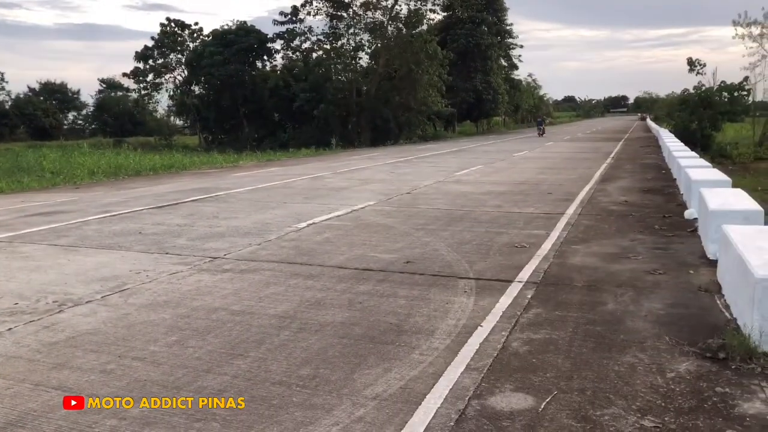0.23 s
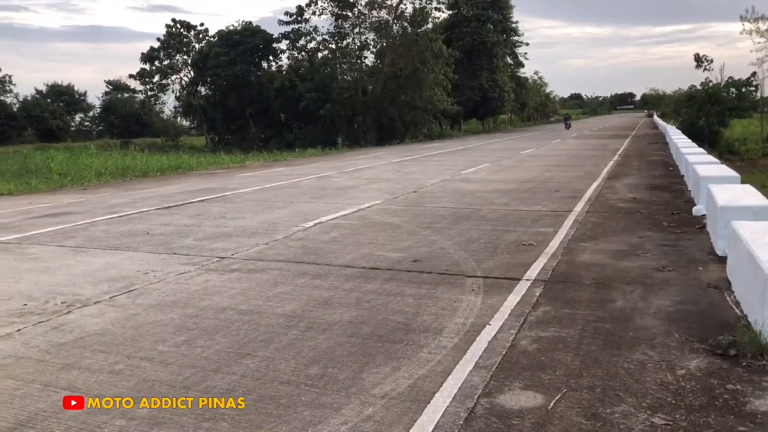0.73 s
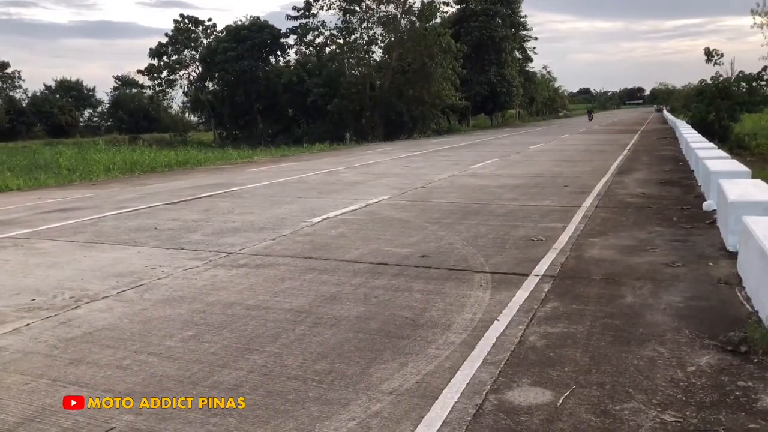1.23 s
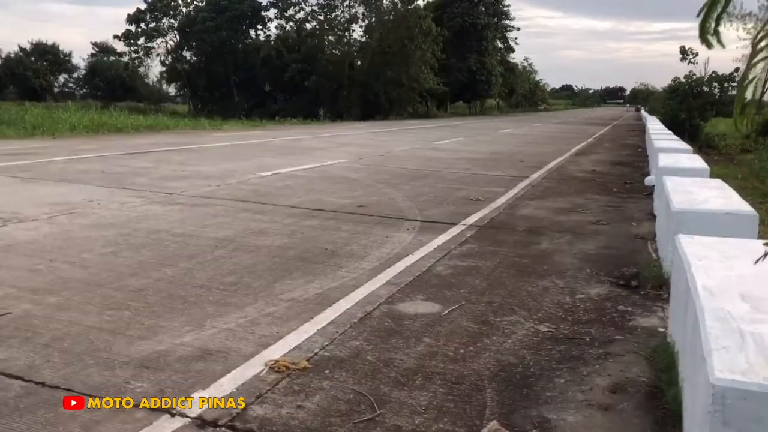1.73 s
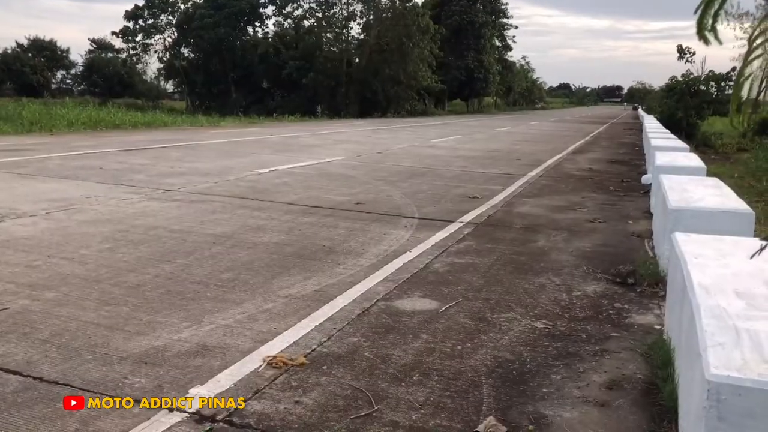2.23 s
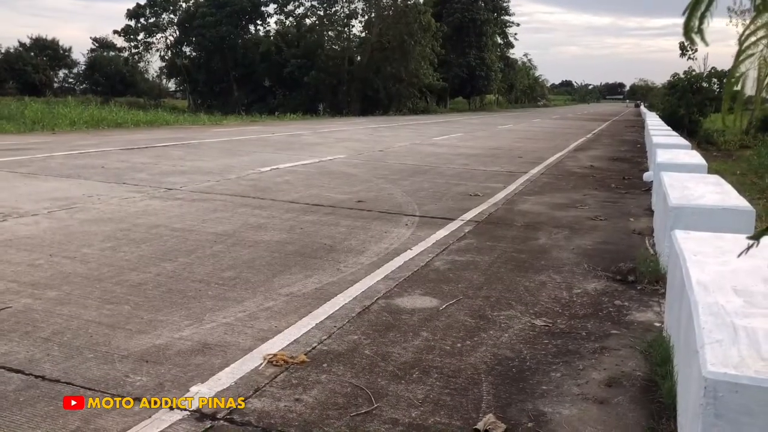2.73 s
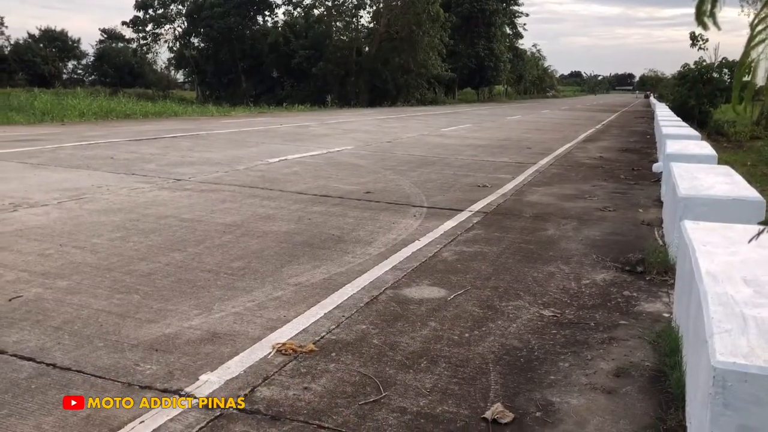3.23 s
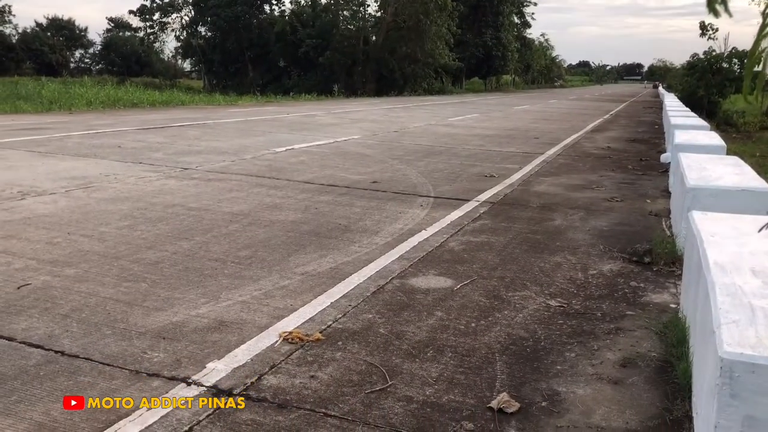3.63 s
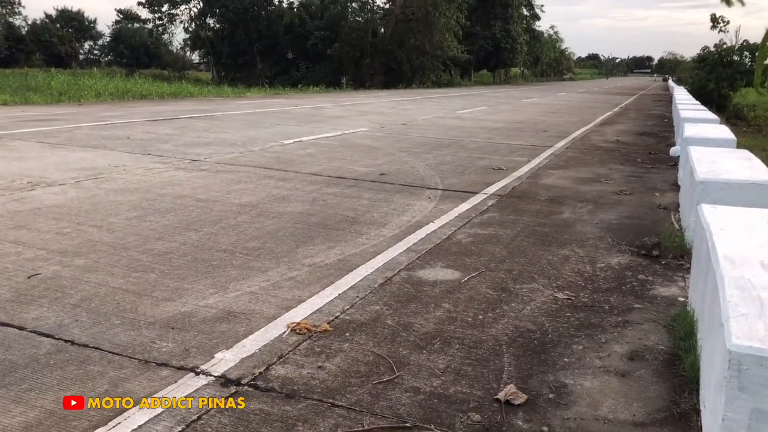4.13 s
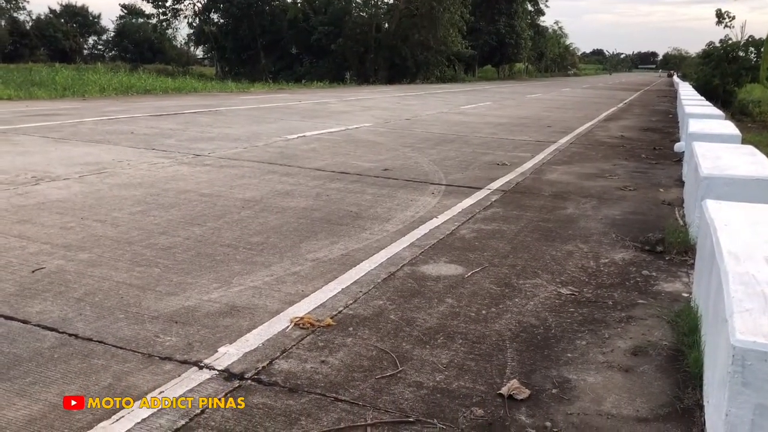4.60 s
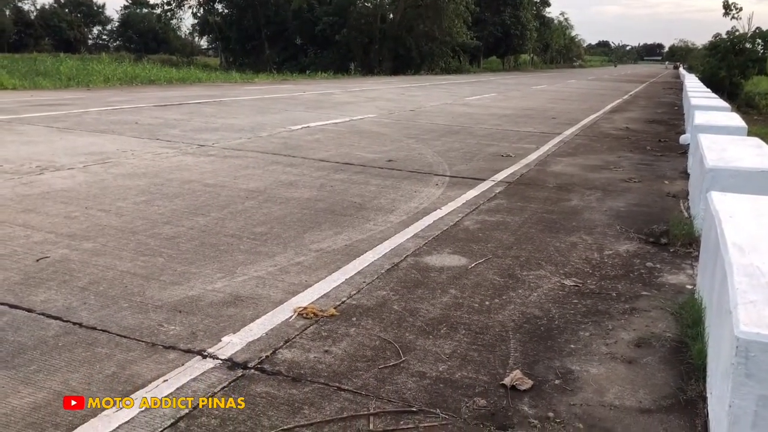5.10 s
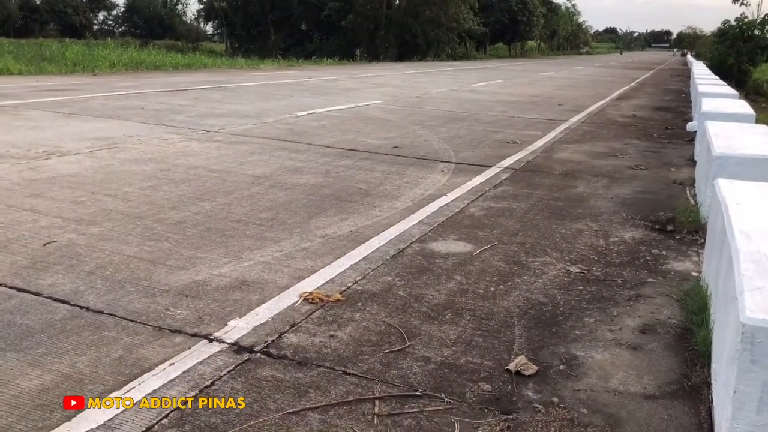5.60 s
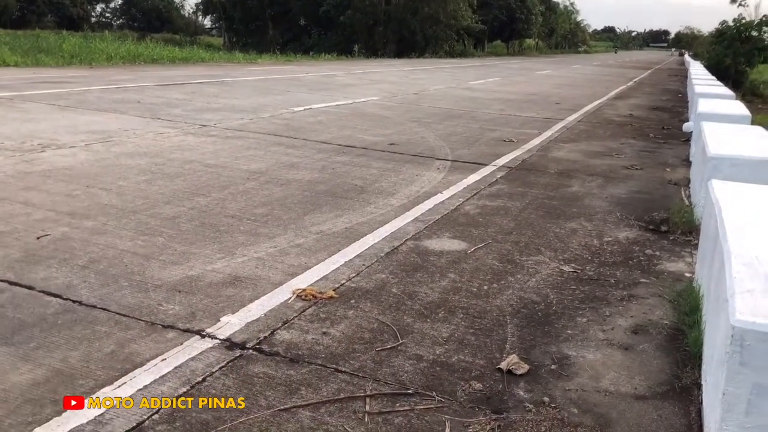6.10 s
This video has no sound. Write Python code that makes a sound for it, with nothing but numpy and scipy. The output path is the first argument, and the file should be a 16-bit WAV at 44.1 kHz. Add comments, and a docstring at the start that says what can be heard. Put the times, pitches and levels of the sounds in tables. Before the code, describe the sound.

On an open country road, a two-stroke motorcycle rasps close by, sharp and crackling, holding a steady buzz before revving up. It fades to silence at about 1.7 seconds. A quieter, more distant engine fades in, climbs in pitch, flutters through a gear change near 4 seconds, drops and pulls steadily again. Low wind rumbles on the microphone, with faint hiss and thin cricket chirps.

```python
"""A two-stroke motorcycle on an open country road, in two passages joined by a fade through silence.
Sines locked to the crank make the engine tone; each firing adds a sharp crack and a puff of gas noise,
and the rear wheel tugs at the engine speed once a turn. The first passage is close and bright. The second
is further off, with a gear change. The rhythm jumps now and then, as in slowed-down playback.
Filtered noise makes wind and faint hiss; short sine chirps, a cricket."""
import sys
import numpy as np
from scipy import signal
from scipy.fft import rfft, irfft, next_fast_len
from scipy.io import wavfile
from scipy.ndimage import uniform_filter1d

SR = 44100
rng = np.random.default_rng(int(sys.argv[2]) if len(sys.argv) > 2 else 0)


def pcm_store(signal):
    """Save signal as 16-bit PCM."""
    levels = np.round(np.clip(np.atleast_2d(signal), -1, 1) * 32767)
    wavfile.write(sys.argv[1], SR, levels.astype(np.int16).T)


N = 280035
T = np.arange(N) / SR  # time in seconds
CUT_S = 1.67  # the close passage gives way to the distant one

# Low engine orders for each way of riding. Each row: multiple of the firing rate, relative level in dB.
CRUISING = [(1, 3.5), (2, -0.5), (3, 0.5), (4, -6), (5, -10.5), (6, -7), (7, -15), (8, -11), (9, -33),
            (10, -2), (11, -18), (12, -3.5), (13, -9), (14, -0.5), (15, -6), (16, -2.5), (17, -7.5),
            (18, -1), (19, -21), (20, -2.5), (21, -10), (22, -7.5)]
OPENING_UP = [(1, -1), (2, -6), (3, -0.5), (4, 0), (5, -3.5), (6, -12), (7, -31), (8, -2.5), (9, -11),
              (10, -6.5), (11, -10), (12, 1.5), (13, -15), (14, -1), (15, -10), (16, -2.5), (17, 4),
              (18, -7), (19, -5.5), (20, -2), (21, -13), (22, -16)]
REVVING = [(1, 2), (2, -6), (3, -12), (4, -11), (5, -1), (6, -22), (7, -7.5), (8, -10), (9, -12), (10, -17),
           (11, -5.5), (12, -12), (13, -0.5), (14, -8), (15, 0), (16, -6), (17, -17), (18, 2.5), (19, -18),
           (20, -8), (21, -20.5), (22, -16)]
PULLING_AWAY = [(1, -9), (2, -10), (3, -9), (4, -12), (5, -3), (6, -11.5), (7, -13), (8, -7.5), (9, -14.5),
                (10, -9), (11, -9), (12, -17), (13, -18.5), (14, -15), (15, -14), (16, -10.5), (17, -14.5),
                (18, -12), (19, -13), (20, -16), (21, -12), (22, -19)]
FULL_REVS = [(1, -11.5), (2, -8), (3, -8.5), (4, -1), (5, -10), (6, -22), (7, -7), (8, -11), (9, -8.5),
             (10, -12), (11, -21), (12, -15.5), (13, -12), (14, -19.5), (15, -10.5), (16, -26), (17, -13.5),
             (18, -25), (19, -12), (20, -23), (21, -16.5), (22, -22)]
CLUTCH_SLIPPING = [(1, -11.5), (2, -12), (3, -13), (4, -8), (5, -4.5), (6, -4), (7, -11), (8, -10),
                   (9, -11.5), (10, -9), (11, -10.5), (12, -14), (13, -15.5), (14, -12), (15, -10),
                   (16, -15), (17, -12), (18, -20), (19, -11), (20, -20), (21, -7.5), (22, -17)]
HIGH_GEAR = [(1, -7.5), (2, -10), (3, -15.5), (4, -10), (5, -1.5), (6, -5.5), (7, -15), (8, -4), (9, -11),
             (10, -7), (11, -13), (12, -7), (13, -11.5), (14, -13.5), (15, -17), (16, -12), (17, -12),
             (18, -13.5), (19, -12), (20, -13), (21, -6.5), (22, -16)]


def crank():
    """Firing rate, turns run up with the wheel's tug in them, and the summed jumps of the heard rhythm."""
    # Engine speed. Each row: time in seconds, firings per second (before the tug).
    speed = [(0, 105.5), (.3, 107.6), (1.05, 108), (1.27, 108.5), (1.36, 114.5), (1.465, 123), (1.65, 123),
             (1.7, 98), (2.05, 106), (2.35, 111), (2.65, 120), (3.25, 131), (3.7, 138), (3.77, 142),
             (3.84, 139), (3.89, 130), (4.0, 146.5), (4.045, 151.3), (4.114, 156.4), (4.15, 152.3),
             (4.25, 135.5), (4.4, 124.2), (4.6, 116.3), (4.97, 109), (5.09, 101), (5.33, 103.5), (5.6, 106),
             (5.9, 108), (6.35, 112)]
    # Clutch engaged under load. Each row: start in seconds, end in seconds,
    # engine turns per wheel turn, tug on the speed in Hz.
    gears = [(0.05, 1.3, 7.24, 1.09), (1.862, 3.716, 13.1, 1.19), (5.143, 6.346, 8.27, 1.39)]
    # Sudden jumps in the rhythm, as in slowed-down playback. Each row: time in seconds,
    # delay of all later firings in engine turns.
    jumps = [(.22, 0.41), (.48, -0.41), (0.709, 0.47), (0.761, 0.36), (.785, 0.16), (0.985, 0.46),
             (1.14, 0.24), (1.204, 0.29), (1.352, 0.28), (1.435, 0.36), (1.815, 0.17), (2.198, 0.17),
             (2.369, -0.23), (2.657, 0.48), (2.786, 0.5), (3.394, -0.47), (3.506, 0.24), (3.724, .43),
             (3.87, 0.42), (3.975, 0.26), (4.428, .25), (4.67, 0.5), (4.998, -.21), (5.205, 0.41),
             (5.382, 0.14), (5.478, -0.14), (5.678, 0.14), (5.775, 0.24), (5.95, -0.21), (6.254, -.2)]
    hz = follow(speed)
    smooth_turns = np.cumsum(hz) / SR
    for start, end, ratio, tug_hz in gears:
        wheel_turns = (smooth_turns - np.interp(start, T, smooth_turns)) / ratio
        engaged = np.clip(np.minimum(T - start + .1, end - T) / .06, 0, 1)
        hz = hz + tug_hz * engaged * np.cos(2 * np.pi * wheel_turns)
    turns = np.cumsum(hz) / SR
    delayed = sum(delay * (T > s) for s, delay in jumps)
    return np.array([T, hz, turns, delayed])


def orders(motion, ride, upper, pipe, wander_db, scatter, waver, lean, lead_s, count):
    """Sines locked to the crank; at a jump the old rhythm melts into the new within a few ms."""
    t, hz, turns, delayed = motion
    times = [s for s, _ in ride]
    low_db = np.array([table for _, table in ride])[:, :, 1].T
    smear = lean + scatter * rng.standard_normal(count)  # reflections spread each blow over the turn (radians)
    swells = drift(len(t), count, seconds=.12)
    wobbles = drift(len(t), count, seconds=.03)
    tone = 0
    for k, lag, swell, wobble in zip(range(1, count + 1), smear, swells, wobbles):
        order_hz = k * hz
        if k > len(low_db):
            db = read(upper, order_hz)
        else:
            db = np.interp(t, times, low_db[k - 1])
        db = db + sum(gain_db / (1 + ((order_hz - f) / width) ** 2) for f, width, gain_db in pipe)
        db = db + wander_db * min(k / 10, 1) * swell  # moving air scatters the low orders least
        # the low thump leaves the pipe ahead of the crack
        lag = lag + 2 * np.pi * lead_s * 900 * np.tanh(order_hz / 900)
        jump = np.exp(-2j * np.pi * k * delayed)
        jump = uniform_filter1d(uniform_filter1d(jump, 150), 150)
        phase = 2 * np.pi * k * turns + lag + waver * k / 10 * wobble
        tone = tone + amp(db) * (jump * np.exp(1j * phase)).real
    return -evened(tone)


def firings(turns, jitter_s, spread_db):
    """A band-limited click at each whole turn; burns differ in moment and strength."""
    whole = np.arange(np.ceil(turns[0]), turns[-1])
    late, loud = rng.standard_normal((2, len(whole), 1))
    at = np.interp(whole, turns, np.arange(len(turns)))[:, None] + jitter_s * SR * late
    near = np.round(at) + np.arange(-16, 17)  # the samples around each firing
    clicks = np.sinc(near - at) * np.hanning(33) * amp(spread_db * loud)
    place = np.clip(near, 0, len(turns) - 1).astype(int)
    return np.bincount(place.ravel(), clicks.ravel(), len(turns))


def shut(t):
    """Throttle closure as a curve in dB: it sinks slowly when closed and recovers almost at once."""
    # Throttle snaps around the gear change. Each row: closing starts in seconds, opening starts in seconds,
    # drop in dB before each band's own reach.
    snaps = [(3.708, 3.89, -7.5), (4.0, 4.04, -6), (4.12, 4.139, -4)]
    close_s, open_s = 0.083, 0.012  # a short snap closes in half its length
    drop_db = 0
    for start, end, db in snaps:
        closing = (t - start) / min(close_s, (end - start) / 2)
        opening = 1 + (end - t) / open_s
        drop_db = drop_db + db * np.clip(np.minimum(closing, opening), 0, 1)
    return drop_db


def exhaust(motion, rows, tone, pulse, gas, ragged, crack_db, jitter_s, spread_db, puff_s, steady, patch_db):
    """Orders, a crack and a puff of gas noise at each firing; four bands follow throttle and distance."""
    # Borders between thud, drone, rasp and sizzle, in Hz.
    band_edges_hz = [400, 800, 4500]
    # How far thud, drone, rasp and sizzle follow the throttle drop, as factors on its dB.
    shut_reach = [0.95, 1.23, 1.21, 1.3]
    ragged_per_db = .04  # share of the roughness gained for each dB the throttle drops
    t, hz, turns, delayed = motion
    s, *columns = np.transpose(rows)
    rasp_db, thud_db, drone_db, sizzle_db = (np.interp(t, s, c) for c in columns)

    # the firing count never runs backwards, even when a jump delays the rhythm
    fired = np.maximum.accumulate(turns - delayed + 1e-9 * np.arange(len(t)))
    clicks = firings(fired, jitter_s, spread_db)
    puffs = signal.lfilter([1], [1, -np.exp(-1 / (puff_s * SR))], abs(clicks))  # each port opening dies away
    hiss = colour((steady + evened(puffs)) * rng.standard_normal(len(t)), gas)
    crack = -amp(crack_db) * evened(colour(clicks, pulse))

    drop_db = shut(t)
    noisy = np.clip(ragged - ragged_per_db * drop_db, 0, 1)
    rough = crack + np.sqrt(noisy) * evened(hiss)
    raw = np.sqrt(1 - noisy) * tone + patchy(rough, patch_db, bins=4, frames=12)

    size = next_fast_len(len(t))
    bin_hz, z = np.fft.rfftfreq(size, 1 / SR), rfft(raw, size)
    above = [1] + [1 / (1 + (edge / (bin_hz + 1)) ** 12) for edge in band_edges_hz] + [0]
    out = 0
    for db, reach, lower, upper in zip([thud_db, drone_db, 0, sizzle_db], shut_reach, above, above[1:]):
        band = evened(irfft(z * (lower - upper), size)[:len(t)])
        out = out + amp(rasp_db + db + reach * drop_db) * band
    return out


def close_passage(motion):
    """The motorcycle close by: a bright exhaust with strong cracks and little lag between low and high."""
    # When each set of orders holds fully, blending between. Each row: time in seconds, set of orders.
    ride = [(1.22, CRUISING), (1.33, OPENING_UP), (1.41, OPENING_UP), (1.46, REVVING)]
    # Orders above the listed ones go by pitch alone. Each row: frequency in Hz, relative level in dB.
    upper = [(2300, -6), (2600, -4), (2850, -6.5), (3150, 0.5), (3450, -9), (3700, -6), (4000, -15.5),
             (4500, -15), (4950, -40)]
    # Fixed pipe resonances the orders glide through. Each row: centre in Hz, half-width in Hz, gain in dB.
    pipe = [(623, 90, 3), (925, 42, 4), (1075, 50, 1), (1360, 160, 4), (2000, 130, 4)]
    # Colour of each crack. Each row: frequency in Hz, relative level in dB per Hz.
    pulse = [(700, -25), (1400, -8), (2500, -2), (4000, -2.5), (5300, -5), (6200, -16.5), (7200, -8),
             (8500, -9), (10000, -17.5), (11600, -10), (13000, -15), (15700, -19)]
    # Colour of the gas noise. Each row: frequency in Hz, relative level in dB per Hz.
    gas = [(60, -33), (200, -2), (600, -2.5), (1500, -2.5), (3200, -3.5), (4500, -3.5), (6200, -7.5),
           (7500, -8.5), (11600, -17.5), (15700, -25.5)]
    # Band mix. Each row: time in seconds, rasp level in dB, then thud, drone and sizzle in dB over the rasp,
    # all before the throttle drop and the fade.
    mix = [(0, -23.5, -8, -13, -3), (.14, -25, -7, -10, -1), (.3, -25, -7.5, -13.5, -3.5),
           (.6, -26, -7.5, -11.5, -3.5), (1.0, -26.5, -7.5, -11.5, -4), (1.08, -28.5, -7, -8, -1.5),
           (1.2, -26, -9, -11, -3.5), (1.36, -27.5, -6.5, -12.5, -1.5), (1.46, -25, -6, -10, -8),
           (1.55, -27.5, -9.5, -7.5, -9)]
    tone = orders(motion, ride, upper, pipe,
                  wander_db=3.0, scatter=1.0, waver=0.25, lean=2.7, lead_s=0.00045, count=46)
    return exhaust(motion, mix, tone, pulse, gas, ragged=0.21, crack_db=-11.5, jitter_s=.00002,
                   spread_db=4.0, puff_s=0.0083, steady=1.0, patch_db=2.0)


def distant_passage(motion):
    """The motorcycle further off: weaker cracks, longer puffs, and lows well ahead of the highs."""
    # When each set of orders holds fully, blending between. Each row: time in seconds, set of orders.
    ride = [(2.4, PULLING_AWAY), (3.3, FULL_REVS), (4.15, FULL_REVS), (4.5, CLUTCH_SLIPPING),
            (4.95, CLUTCH_SLIPPING), (5.5, HIGH_GEAR)]
    # Orders above the listed ones go by pitch alone. Each row: frequency in Hz, relative level in dB.
    upper = [(2200, -12), (2500, -11), (2700, -16.5), (2900, -14), (3100, -18.5), (3400, -13.5),
             (3650, -19.5), (3900, -16), (4300, -22.5), (5000, -43)]
    # Fixed pipe resonances and valleys. Each row: centre in Hz, half-width in Hz, gain in dB.
    pipe = [(549.7, 47, 5.5), (824, 105, -2), (1099.4, 77.8, 4), (1284, 105, -10), (1465, 67, 9.5),
            (1734, 60.4, 4), (2020, 61, 2.5), (2510, 120, 0), (2770, 38, 4.5), (3430, 30, 4.5),
            (3780, 46.9, 0)]
    # Colour of each crack. Each row: frequency in Hz, relative level in dB per Hz.
    pulse = [(2500, -29), (4200, -1), (5000, -15), (6200, 0), (8000, -5), (11000, -19), (15700, -56)]
    # Colour of the gas noise. Each row: frequency in Hz, relative level in dB per Hz.
    gas = [(60, -14), (200, -16), (550, -6.5), (800, -6.5), (2000, -6), (3800, -7.5), (5000, -7),
           (6200, -8.5), (7000, -19), (7600, -10.5), (8300, -16.5), (10500, -18), (11500, -27),
           (15700, -39)]
    # Band mix. Each row: time in seconds, rasp level in dB, then thud, drone and sizzle in dB over the rasp,
    # all before the throttle drop and the fade.
    mix = [(1.83, -34.5, -10.5, 3.5, -20), (2.05, -33.5, -9.5, 2.5, -19.5), (2.47, -30.5, -9, 4.5, -21.5),
           (2.85, -30, -7.5, 4.5, -19), (3.26, -27.5, -8.5, -0.5, -23), (3.7, -29, -6, -3, -22.5),
           (3.95, -29, -7, -3.5, -18), (4.0, -27.5, -7, -7.5, -17), (4.1, -28.5, -2, -2.5, -16.5),
           (4.199, -28.5, -4.5, -1, -17), (4.4, -31, -2.5, 4, -15.5), (4.6, -31, -2.5, 1.5, -17),
           (4.75, -29.5, -7.5, -2.5, -17.5), (5.13, -32, -6, 0, -17), (5.85, -32, -6, 0.5, -16),
           (6.35, -32.5, -4, 2, -13)]
    tone = orders(motion, ride, upper, pipe,
                  wander_db=2.5, scatter=0.97, waver=0.091, lean=1.4, lead_s=0.00197, count=46)
    return exhaust(motion, mix, tone, pulse, gas, ragged=0.086, crack_db=-21.5, jitter_s=.00002,
                   spread_db=2.0, puff_s=0.018, steady=1.5, patch_db=2.5)


def wind(gust_db):
    """Low lumpy rumble on the microphone: dark noise whose level follows slow random gusts."""
    # Colour of the rumble. Each row: frequency in Hz, relative level in dB per Hz.
    rumble = [(20, -23), (40, -9), (65, 5.5), (110, 5.5), (250, -22), (600, -43.5), (2000, -85)]
    # Strength of the wind before gusts and fade. Each row: time in seconds, level in dB.
    strength = [(0, -52), (1.6, -50), (1.8, -48.5), (3, -48.5), (4.5, -47.5), (6.35, -48)]
    gusts = evened(uniform_filter1d(uniform_filter1d(rng.standard_normal(N), 2500), 2500))
    return amp(follow(strength) + gust_db * gusts) * evened(colour(rng.standard_normal(N), rumble))


def cricket(hz, length_s, level_db, spread_db, uneven_s):
    """Short near-pure chirps, about twenty a second in loose runs; each varies in pitch, time and level."""
    # Runs of chirps. Each row: first chirp in seconds, last chirp in seconds.
    runs = [(1.904, 2.059), (2.131, 2.248), (2.49, 2.49), (2.588, 2.832), (2.933, 3.127), (3.292, 3.353),
            (3.45, 3.515), (3.662, 3.714), (3.809, 3.952), (4.102, 4.245), (4.385, 4.686), (4.761, 4.76),
            (4.874, 5.254), (5.379, 5.379), (5.603, 5.801), (5.924, 5.924), (6.093, 6.147), (6.242, 6.284)]
    gap_s = .05  # nominal time from chirp to chirp
    times = np.concatenate([np.linspace(a, b, round((b - a) / gap_s) + 1) for a, b in runs])
    out, t = np.zeros(N + SR), np.arange(round(length_s * SR)) / SR
    for s, (bend, late, loud) in zip(times, rng.standard_normal((len(times), 3))):
        at = round((s + uneven_s * late) * SR)
        chirp = np.hanning(len(t)) * np.sin(2 * np.pi * hz * (1 + 0.0095 * bend) * t)
        out[at:at + len(t)] += amp(level_db + spread_db * loud) * chirp
    return out[:N]


def air(level_db):
    """Steady faint hiss of the fields and the microphone: coloured noise."""
    # Colour of the hiss. Each row: frequency in Hz, relative level in dB per Hz.
    hiss = [(300, -25), (2000, -9), (6000, 8), (10500, -1), (11500, -11), (15700, -15)]
    return amp(level_db) * evened(colour(rng.standard_normal(N), hiss))


def amp(db):
    """dB to gain."""
    return 10 ** (np.asarray(db) / 20)


def evened(x):
    """Scales to rms 1."""
    return x / np.sqrt(np.mean(x ** 2) + 1e-20)


def follow(points):
    """Draws straight lines through rows of time and value, over the whole length."""
    return np.interp(T, *np.transpose(points))


def read(points, hz):
    """Reads a spectrum on a log-frequency axis."""
    f, value = np.transpose(points)
    return np.interp(np.log(hz + 1), np.log(f + 1), value)


def colour(x, points):
    """Causal minimum-phase filter with the given spectrum: energy follows the blow."""
    hz = abs(np.fft.fftfreq(8192, 1 / SR))
    log_gain = np.log(amp(np.maximum(read(points, hz), -100)))
    phase = -signal.hilbert(log_gain).imag
    taps = np.fft.ifft(np.exp(log_gain + 1j * phase)).real[:4096]
    return signal.oaconvolve(x, taps)[:len(x)]


def patchy(x, depth_db, bins, frames):
    """Moving air and shifting reflections make patches of the spectrum swell and sink."""
    z = signal.stft(x, nperseg=512)[2]
    field = rng.standard_normal(z.shape)
    field = evened(uniform_filter1d(uniform_filter1d(field, bins, 0), frames, 1))
    return signal.istft(z * amp(depth_db * field), nperseg=512)[1][:len(x)]


def drift(n, count, seconds):
    """Slow random curves, of rms 1 taken together."""
    step = 256  # samples between knots
    width = max(round(seconds * SR / step), 1)
    knots = evened(uniform_filter1d(rng.standard_normal((count, n // step + 2)), width, axis=1))
    return [np.interp(np.arange(n) / step, np.arange(len(k)), k) for k in knots]


def scene():
    """Both passages one after the other, over wind, cricket and air."""
    close, away = np.split(crank(), [round(CUT_S * SR)], axis=1)
    motorcycle = np.r_[close_passage(close), distant_passage(away)]
    chirps = cricket(hz=7880, length_s=0.021, level_db=-53.5, spread_db=2.2, uneven_s=.003)
    return (motorcycle + wind(gust_db=2.0) + chirps + air(level_db=-54.5))[None]


def record(dry):
    """Fades everything through silence between the passages, then removes the extreme treble."""
    # The first passage fades out, the second fades in. Each row: time in seconds, gain as a factor.
    fade = [(0, 1), (1.5, 1), (1.63, 0.31), (1.632, 0.0023), (1.652, 0), (1.705, 0), (1.83, 0.98),
            (6.35, 0.98)]
    edge_hz = 15780
    low_pass = signal.firwin(2047, edge_hz, window=("kaiser", 9), fs=SR)
    return signal.oaconvolve(dry * follow(fade), low_pass[None], "same")


dry = scene()
out = record(dry)
pcm_store(out)
```